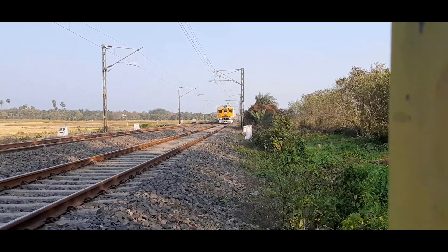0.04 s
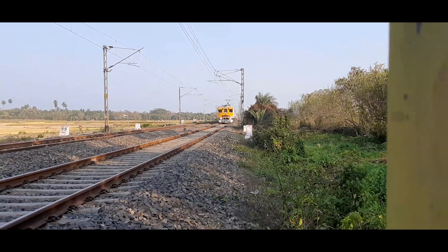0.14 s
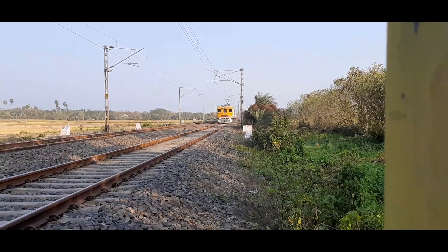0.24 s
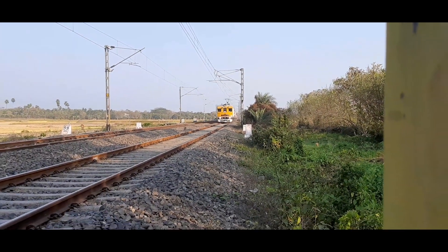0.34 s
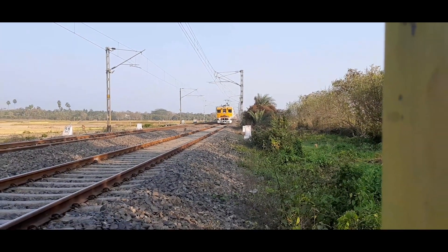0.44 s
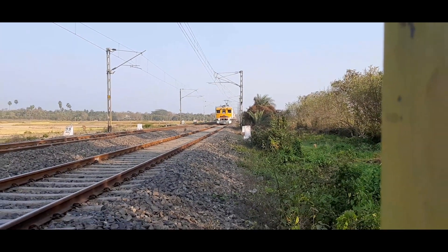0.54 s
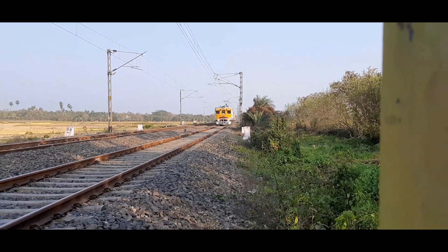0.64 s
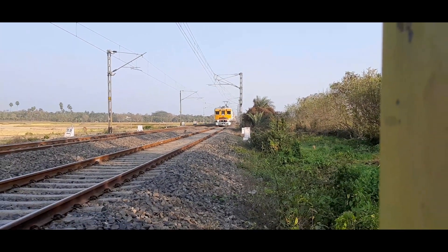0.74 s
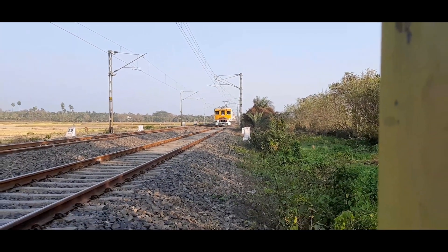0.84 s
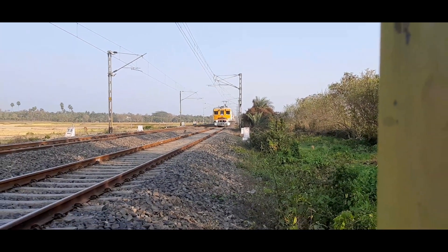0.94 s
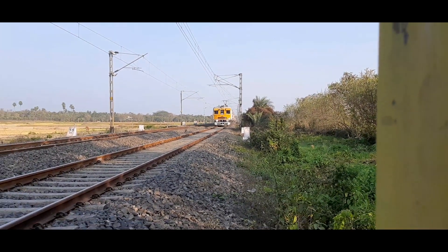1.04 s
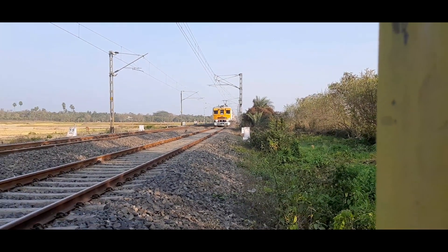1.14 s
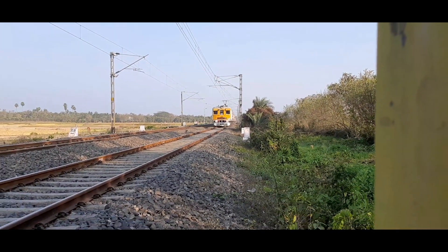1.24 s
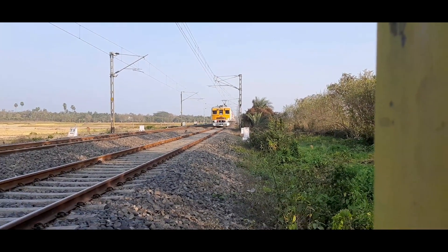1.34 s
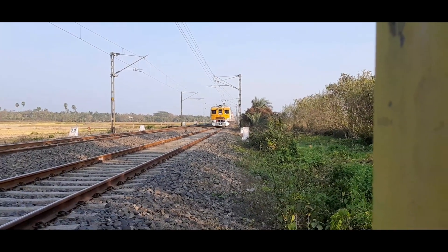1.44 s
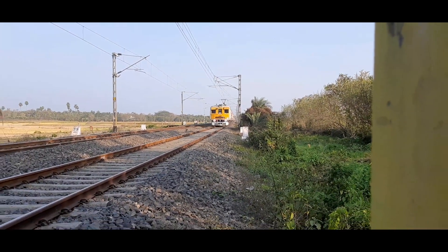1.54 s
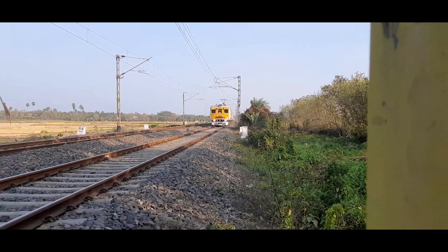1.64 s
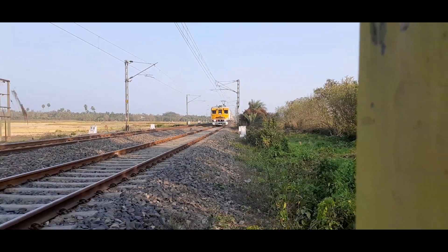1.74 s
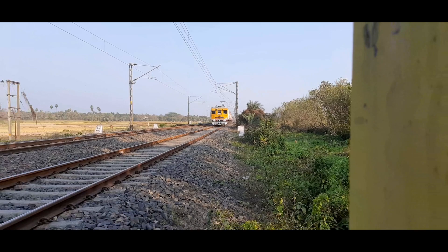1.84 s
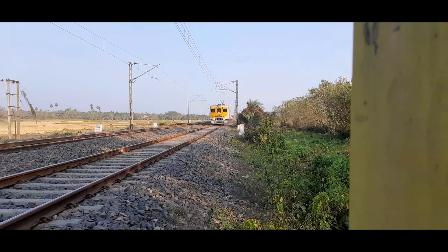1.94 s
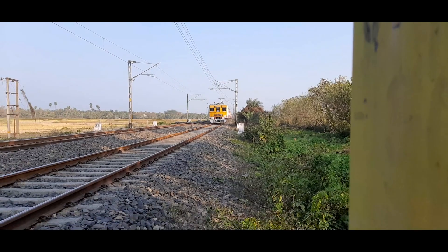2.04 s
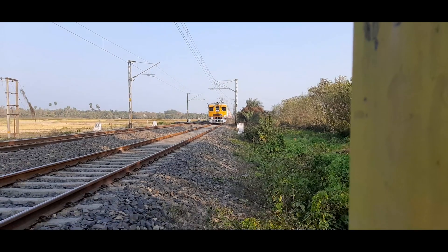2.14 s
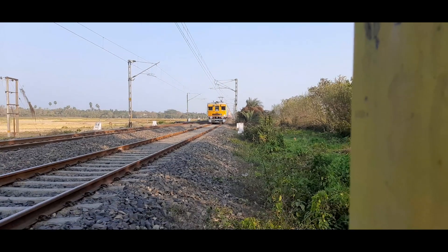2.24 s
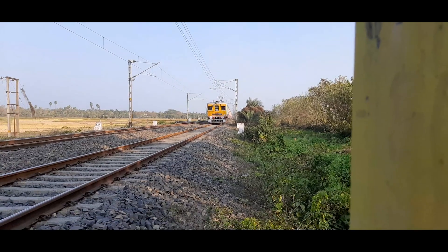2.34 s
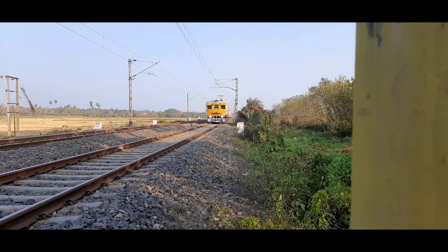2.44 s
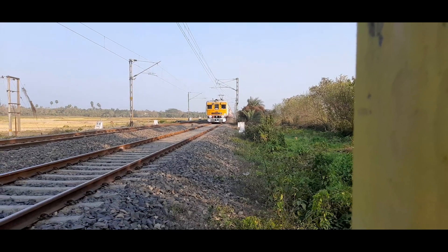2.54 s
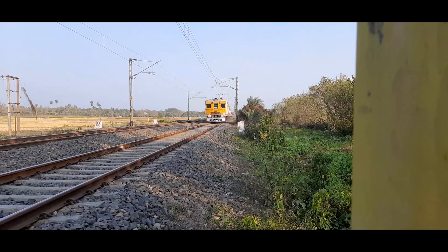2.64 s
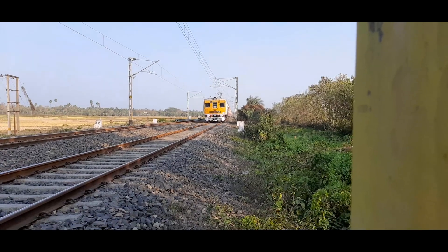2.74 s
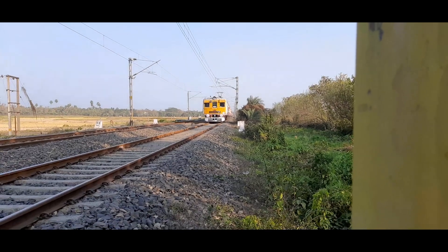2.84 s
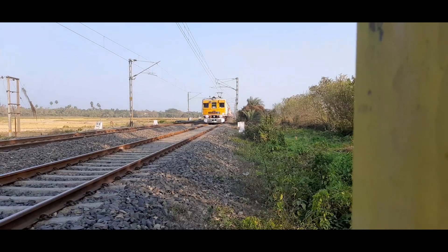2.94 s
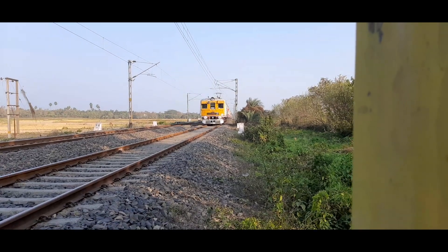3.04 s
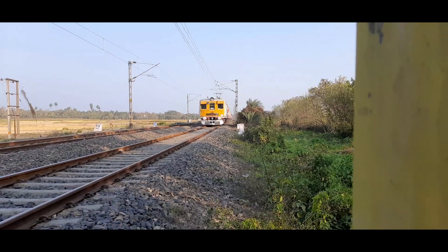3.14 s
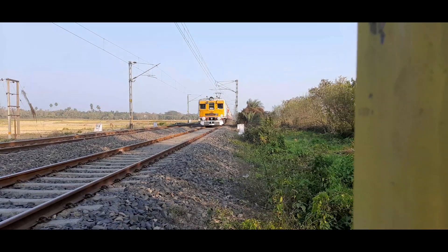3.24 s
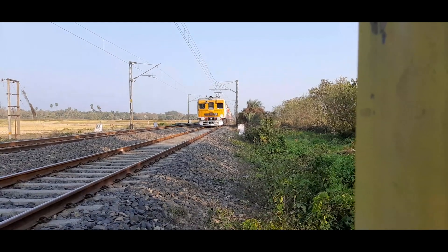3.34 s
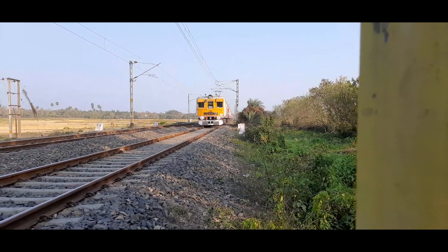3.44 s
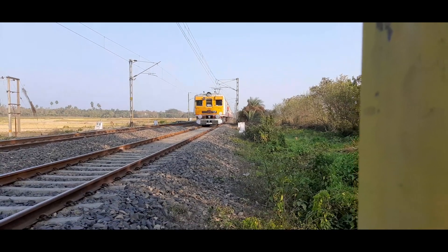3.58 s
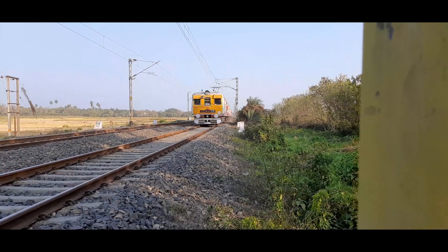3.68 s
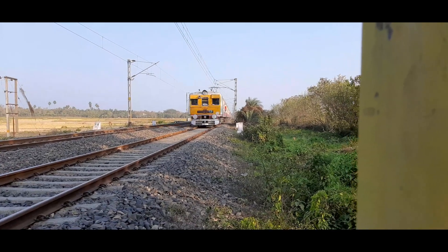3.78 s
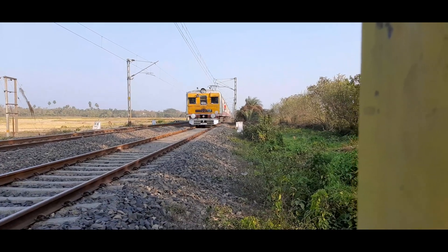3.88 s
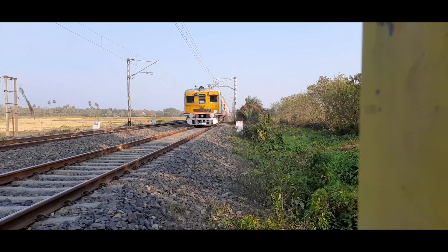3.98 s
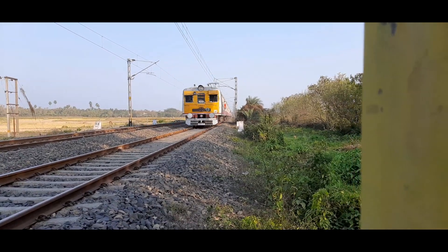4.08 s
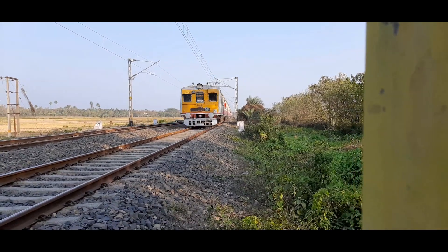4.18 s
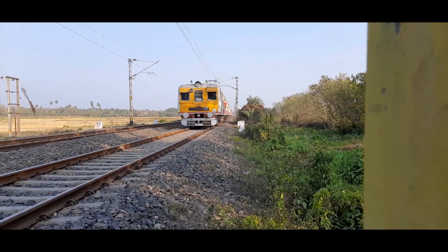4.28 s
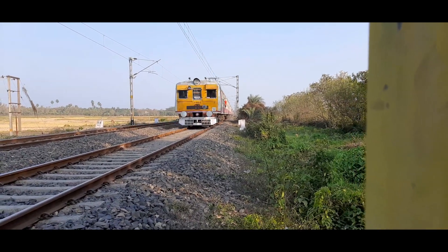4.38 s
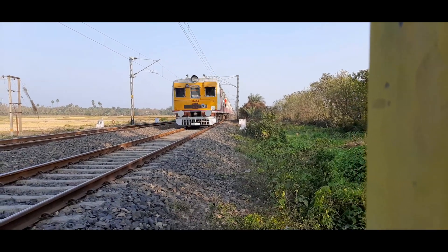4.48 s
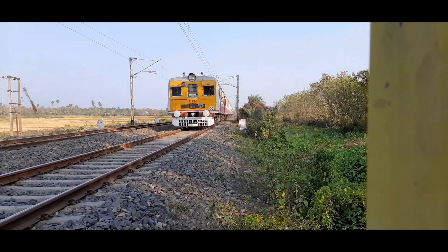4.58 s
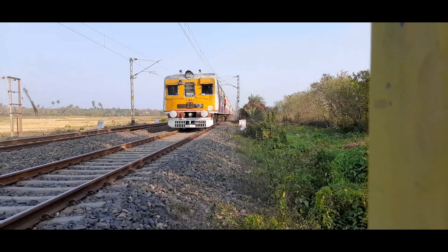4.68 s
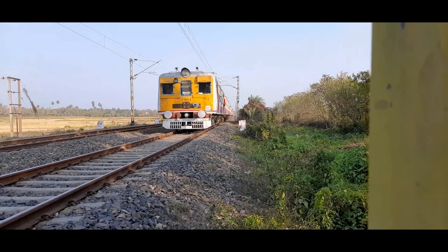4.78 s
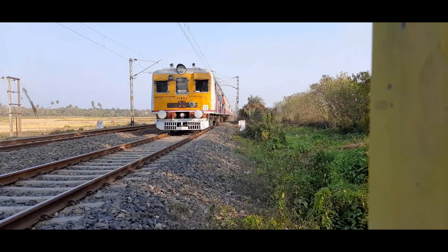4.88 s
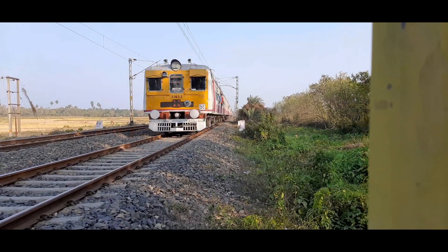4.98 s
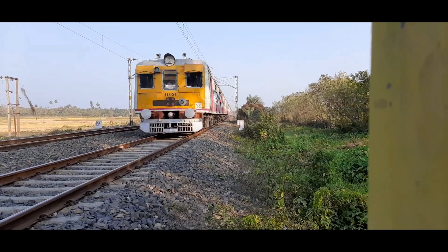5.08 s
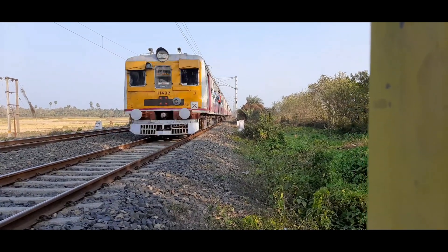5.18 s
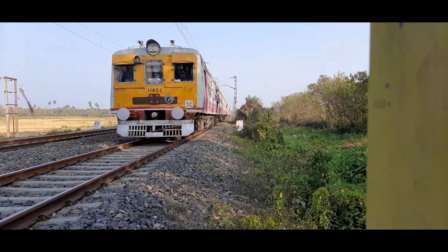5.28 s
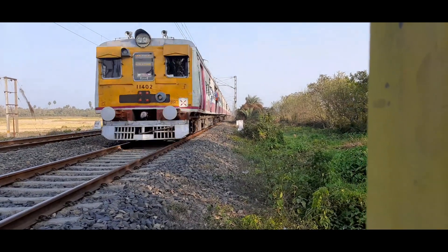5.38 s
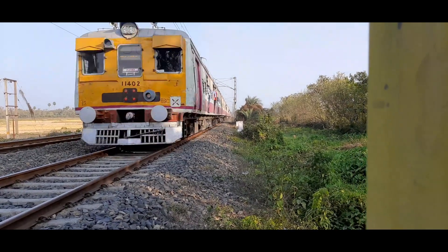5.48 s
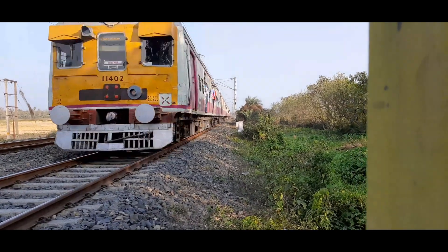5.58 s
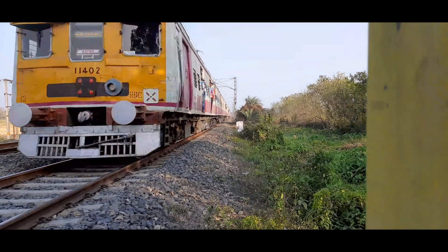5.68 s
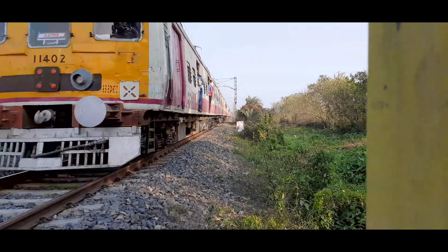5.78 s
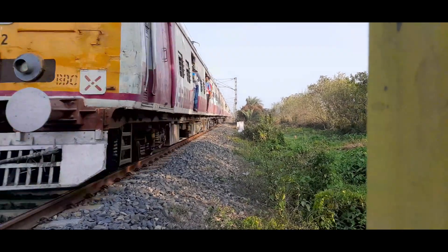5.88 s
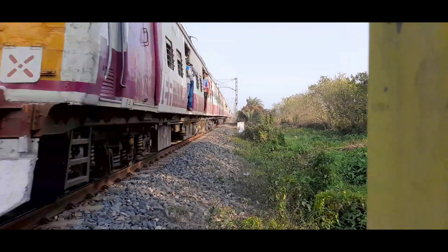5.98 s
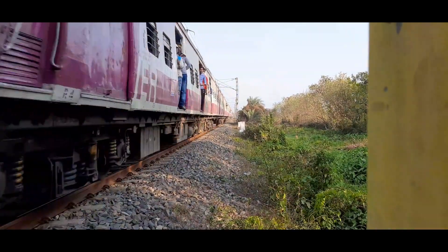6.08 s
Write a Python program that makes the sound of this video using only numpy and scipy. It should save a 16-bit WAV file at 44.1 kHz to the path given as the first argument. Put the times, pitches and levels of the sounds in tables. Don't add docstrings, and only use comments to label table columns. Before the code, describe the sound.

A commuter train approaches through open fields. First a low rumble, muffled thumps, a few metallic joint knocks and bird whistles in nearby bushes; then two sustained, single-pitched air horn blasts of about a second each, the second nearer and more changeable in its overtones. After the horn stops, wheel noise surges, deep and gritty, with dense heavy blows close by. Stereo hand-held phone, open air, only light scattered reflections and little deep bass.

```python
import sys
import numpy as np
from scipy import signal
from scipy.fft import rfft, irfft, next_fast_len
from scipy.io import wavfile
from scipy.ndimage import uniform_filter1d, map_coordinates

SR = 44100
rng = np.random.default_rng(int(sys.argv[2]) if len(sys.argv) > 2 else 0)


def gain_from_db(level_db):
    decades = np.asarray(level_db, float) / 20
    return 10 ** decades


def log_audio(samples):
    frames = np.atleast_2d(samples).T
    limited = np.clip(frames, -1, 1)
    pcm = np.round(limited * 32767).astype(np.int16)
    wavfile.write(sys.argv[1], SR, pcm)


N = 269892

# time in seconds, pitch in Hz, tone in dB, buzz in dB.
HORN_BLASTS = [
    [(2.757, 759.3, -9.5, 4.5), (2.895, 762.2, -12.5, 1.5), (3.12, 759, -18, -5.5), (3.27, 763, -12, 2),
     (3.42, 760.8, -13, 1.5), (3.5, 761.2, -11.5, 2.5), (3.57, 761.8, -17, -6), (3.645, 759.5, -21, -9.5),
     (3.73, 764, -27, -4.5)],
    [(4.26, 758, -12.5, 1.5), (4.405, 763.4, -12.5, 2.5), (4.48, 760, -13.5, 4.5), (4.63, 759.4, -13.5, -4),
     (4.855, 758, -12.5, -2.5), (5.08, 757.8, -12, -1), (5.28, 757.2, -12.5, 0.5), (5.38, 754.8, -9, 7),
     (5.475, 759.5, -12.5, 12.5)],
]
# multiple, level over the tone in dB, drift in dB/s, share of buzz.
FAR_OVERTONES = [(1, 1, 5, -0.26), (2, -27.5, 12.5, 0.45), (3, -33.5, 29.5, 1), (4, -28, 6.5, -0.36),
                 (5, -45.5, 4, -1.7), (6, -45, 3.5, 0.09), (7, -49.5, -2, .3), (8, -45.5, 13, 0.8),
                 (9, -44, 23, 0.29), (10, -52, 3.5, 0.12), (11, -65.5, 0.5, -0.01),
                 (12, -63.5, -19.5, -0.22), (13, -55.5, 11.5, 0.28), (14, -66, 11.5, 0.77),
                 (15, -66.5, 4, 0.32), (16, -60, 1.5, 0.16), (17, -66.5, -1.5, -0.3), (18, -68.5, 16, 0.07),
                 (19, -60.5, 7, -0.35)]
# multiple, level over the tone in dB, drift in dB/s, share of buzz.
NEAR_OVERTONES = [(1, 1, -2, 0.0), (2, -26, -8, 0.1), (3, -44, -10.5, 0.88), (4, -33, -0.5, 0.03),
                  (5, -45, 15, -0.34), (6, -45, 23.5, -0.56), (7, -37.5, 26, -0.2), (8, -43.5, 10, -0.8),
                  (9, -47.5, -8, 0.7), (10, -50, -2, 0.5), (11, -47, 0.5, -0.1), (12, -58, -19.5, 1.5),
                  (13, -42.5, 6, 0.06), (14, -56, -14, 0.7), (15, -60, 0.5, 0.5), (16, -48.5, 8, -0.2),
                  (17, -48, 17, -0.5), (18, -49, 9, -0.14), (19, -56, 5, -4), (20, -63, 6.5, 0.5)]
# frequency in Hz, left-right in dB, left lead in rad, turning of that lead in rad/s.
HORN_AT_PHONE = [
    [(760, -2.5, 0.14, -0.19), (1520, 7, 1.86, -.8), (2280, 6, 1.4, -.8), (3040, 4, 1.7, 0),
     (3800, -4, 1.4, 1), (5300, 4.5, 2.3, 0), (14000, 5.5, 0.5, 0)],
    [(760, -1, 0.35, 0.73), (1500, 2.5, 2.09, 0.8), (2280, 9.5, 2.06, -0.5), (3040, 3, 1.77, 1.5),
     (3800, 6.5, 2.2, 1.5), (4550, 7, 4.4, 6.5), (5470, 4, 2.9, 3), (6000, 8.5, 4.6, 4.5),
     (14000, 9, 6.5, 2)],
]
# time in seconds, width in seconds, overtone multiple, change in dB.
PATHS_MEET = [(4.4, 0.03, 4, -12), (5.11, .06, 4, -9), (5.22, .03, 4, 6), (4.6, .02, 4, -7),
              (4.95, 0.079, 4, 3.5), (5.4, .08, 7, 4), (4.72, .04, 7, -4.5), (4.86, 0.055, 6, 6.5),
              (4.97, .03, 6, -6), (5.1, .04, 6, 4), (4.37, .03, 9, -6), (4.48, .05, 9, 3.5),
              (4.72, .08, 9, -7), (5.48, .04, 3, 9.5), (5.14, 0.11, 7, 1.5), (5.47, .04, 7, -7.5),
              (5.2, .15, 17, -3.5), (5.34, .06, 2, 2.5), (4.33, .05, 13, 10.5), (4.7, .1, 13, -5),
              (4.96, .04, 5, 5.5), (3.5, .06, 9, -6), (2.97, .03, 5, 4), (3.4, 0.046, 4, 5),
              (2.9, 0.05, 3, 4.5), (2.95, .07, 7, 2.5), (3.05, .07, 8, -4.5)]

# frequency in Hz, level in dB per Hz.
THRUM_COLOUR = [(15, -63), (25, -33.5), (41, -9.5), (75, 0.5), (171, -10.5), (190, -9.5), (227, -24.5),
                (300, -34.5), (390, -48.5), (660, -120)]
# frequency in Hz, level in dB per Hz.
ROLL_COLOUR = [(59, -39.5), (100, -3.5), (141, -12), (210, -3.5), (254, -4.5), (370, -10.5), (464, -7.5),
               (533, -18), (819, -14.5), (994, -21.5), (1300, -50), (1690, -67.5), (2860, -120)]
# frequency in Hz, level in dB per Hz.
GRIND_COLOUR = [(590, -32), (1000, -3.5), (1270, -10), (1960, -5), (2700, -8.5), (3010, -7), (5190, -9.5),
                (8500, -20.5), (11000, -57), (18700, -120)]
# frequency in Hz, level in dB per Hz.
HISS_COLOUR = [(4710, -27.5), (8000, -4), (9580, 1), (10600, -2), (14100, -7), (15500, -19)]
# frequency in Hz, width in Hz, level in dB.
RAIL_HUM = [(447.7, 19, 1.5), (740.5, 22, 0.5), (1010, 72, -1.5), (1388, 47, -3.5), (1540, 110, -7)]
# time in seconds, roughness in dB.
TRACK_ROUGHNESS = [(0, 2), (.47, -1), (.75, 0.5), (1.2, -2), (1.74, 1.5), (2.0, -1.5), (2.59, 3.5),
                   (3.2, -3), (3.44, -6), (3.7, 0.5), (3.95, 4), (4.33, -0.5), (4.86, 1), (5.3, 0),
                   (5.5, 2.5), (5.76, 3), (6.12, -2)]

# time in seconds, peak in dB, ring in Hz, clunk in dB, thud in dB.
FAR_JOINTS = [(0.8194, -48, 990, -8, 15), (1.3535, -33.5, 1362, -21, -5), (1.5442, -30.5, 1010, -12, -4),
              (1.546, -39, 1290, -20, -20), (1.6969, -32, 1050, -9, 0), (1.8808, -30.5, 1010, -26, -12),
              (2.6633, -35.5, 982, -11.5, -6), (2.7706, -32.5, 895, 5, -5.5),
              (3.6877, -31, 1405, -7.5, -7.5), (3.709, -41.5, 880, -7.5, 21), (3.8741, -30, 937, 1, -11)]
# time in seconds, peak in dB, pitch in Hz.
NEAR_WHEELS = [(5.313, -25, 204.3), (5.348, -29.5, 283), (5.38, -24.5, 230.2), (5.414, -29, 233),
               (5.438, -21, 234), (5.499, -20.5, 279), (5.578, -20, 243), (5.633, -18, 255),
               (5.657, -20.5, 260), (5.73, -21.5, 230.7), (5.754, -21.5, 255), (5.801, -20, 251.4),
               (5.837, -19, 235.5), (5.858, -16.5, 277), (5.935, -14, 259), (5.989, -20, 223),
               (6.036, -16, 265), (6.079, -15, 224), (6.11, -11, 313)]
# time in seconds, peak in dB, pitch in Hz.
GROUND_BOOMS = [(0.321, -35, 86.1), (0.491, -35, 80), (0.626, -31, 64.8), (0.763, -28, 93),
                (0.884, -31.5, 92.5), (1.01, -31, 83.4), (1.146, -31, 86.6), (1.487, -30, 89),
                (1.68, -27, 78.4), (1.818, -29, 88.8), (2.111, -27, 80.7), (2.456, -29.5, 73.2),
                (2.615, -34.5, 87), (3.091, -35, 107.8), (3.157, -33, 94.2), (3.278, -37.5, 110.7),
                (3.408, -40.5, 117.3), (3.52, -36, 78.1), (3.763, -29.5, 94.9), (3.945, -32.5, 99.3),
                (4.147, -25.5, 96.3), (4.336, -34.5, 158), (4.423, -30, 87.7), (4.548, -35, 65),
                (4.644, -33, 100.5), (4.737, -28, 84.6), (4.993, -31, 105), (5.075, -27, 92.8),
                (5.523, -33, 153), (5.66, -29, 104), (5.83, -24, 122), (5.927, -24, 78)]
# time in seconds, peak in dB, pitch in Hz.
CLOSE_BOOMS = [(5.169, -33, 91.5), (5.289, -29, 105), (5.429, -29, 94.2), (5.569, -32, 100),
               (5.739, -26.5, 157), (5.879, -35, 155), (6.049, -22, 80.9), (6.088, -27, 91)]
# time in seconds, level in dB.
SPARKS = [(3.673, -48), (3.86, -46.5), (5.716, -44), (5.879, -43)]

# start in seconds, length in seconds, start pitch in Hz, level in dB.
RISING_NOTES = [(0.14, 0.065, 2760, -62), (.269, 0.088, 2660, -63), (.27, 0.12, 3750, -62),
                (0.332, 0.026, 4850, -60), (0.379, 0.09, 2414, -65), (0.461, 0.066, 3300, -57.5),
                (0.615, .05, 3450, -62), (0.842, 0.099, 2300, -62), (1.023, 0.077, 4820, -54),
                (1.015, .036, 2855, -53.5), (1.349, 0.11, 3105, -57), (1.47, .07, 3350, -67),
                (1.466, 0.092, 2160, -61.5), (1.492, 0.066, 4130, -55.5), (1.712, 0.074, 2100, -63),
                (2.207, 0.08, 2980, -60), (2.25, 0.06, 2380, -58), (2.308, 0.08, 3600, -63),
                (2.56, 0.12, 2404, -63), (2.714, 0.07, 2420, -56.5), (3.72, 0.088, 3600, -59.5),
                (4.079, 0.028, 4250, -57.5)]
# start in seconds, start pitch in Hz, level in dB.
FALLING_CHIPS = [(0, 4590, -62), (0.371, 3340, -62), (.43, 4480, -58), (.51, 3550, -56.5),
                 (1.638, 4950, -59.5), (4.126, 4050, -56), (4.597, 4400, -59.5), (4.651, 4410, -59),
                 (4.71, 4300, -66), (4.765, 4380, -65.5)]
# start in seconds, length in seconds, pitch in Hz, level in dB.
LEVEL_NOTES = [(.01, .05, 3700, -64), (0.147, 0.11, 3404, -65), (.517, 0.03, 4280, -64),
               (0.76, .09, 4740, -59), (1.147, 0.031, 2840, -52.5), (.695, .065, 3500, -61),
               (0.946, .06, 2650, -70), (1.005, .015, 4500, -59), (1.402, .045, 5500, -63),
               (1.93, .04, 2550, -69), (2.816, .022, 4280, -58), (2.865, .03, 4550, -60.5),
               (3.022, .025, 4260, -63.5), (3.812, .07, 3800, -66), (1.601, 0.031, 5420, -63),
               (1.752, 0.066, 2832, -56), (5.488, 0.036, 4860, -51.5), (5.871, .014, 5040, -45.5)]
# start in seconds, length in seconds, start pitch in Hz, end pitch in Hz, level in dB.
STEEP_NOTES = [(1.05, .04, 3100, 4330, -62), (1.111, .04, 4510, 3500, -61), (1.445, 0.05, 3450, 4130, -62),
               (1.07, .05, 4300, 4700, -54), (1.555, .035, 4300, 4900, -57), (2.41, 0.07, 3800, 4700, -67),
               (2.748, 0.045, 5050, 4780, -60), (3.586, .08, 3860, 5420, -58)]
# start in seconds, length in seconds, start pitch in Hz, held pitch in Hz, level in dB.
HOOKED_NOTES = [(2.892, 0.042, 4780, 5110, -51.5), (1.4, 0.071, 3200, 4000, -59),
                (2.352, 0.07, 3950, 3520, -53), (4.1, 0.038, 5100, 4250, -58),
                (2.708, .045, 3800, 3550, -52.5)]
# time in seconds, pitch in Hz, level in dB.
DOVE_COO = [
    (3.42, 338, -48.5),
    (3.48, 332, -44),
    (3.53, 330, -29.5),
    (3.6, 329, -37.5),
    (3.66, 326, -45),
]

# frequency in Hz, 60 dB decay in seconds.
HEDGE_DECAY = [(300, 0.13), (760, 0.78), (3000, 0.56), (10000, 0.13)]
# frequency in Hz, level in dB per Hz.
LEAVES_COLOUR = [(180, -45.5), (300, -8.5), (449, -12), (516, -6.5), (740, -1), (862, -3.5), (1020, -1),
                 (1830, -12), (2620, -14), (7320, -39.5), (8300, -48.5), (10800, -61.5), (18300, -120)]
# frequency in Hz, width in Hz, level in dB.
INSECT_BANDS = [(7340, 1100, -1), (10430, 270, 3), (11030, 300, 6.5), (10800, 2100, -9.5),
                (12600, 5600, -20.5)]

# frequency in Hz, left-right likeness.
WIDE_LIKENESS = [(60, 0.77), (180, 0.75), (550, -0.038), (1650, -0.59), (4970, 0.4), (15000, -0.51)]
# frequency in Hz, left-right likeness.
WHEEL_LIKENESS = [(60, 0.6), (150, 0.58), (300, 0.98), (1400, 0.19), (3000, 0.16), (7000, 0.09)]
# frequency in Hz, left-right in dB.
MIC_BALANCE = [(60, 5), (200, -0.5), (1300, -1), (4400, -1), (15000, 9)]

ATTACK_S, ATTACK_DB, FLAT_START_HZ = .04, 25, 14
RELEASE_S, RELEASE_DB = (0.016, 0.077), 21
PASS_S = 6.297
THRUM_DB, THRUM_NEAR_DB, THRUM_GROWS, THRUM_ROUGH, DUCK_DB = -43, -24.5, 2, 0.39, 2
ROLL_DB, ROLL_GROWS = -20, 0.96
GRIND_DB, GRIND_GROWS, GRIND_ROUGH, GRIND_DUCK_DB = -39, 0.87, 0.18, 2
HISS_DB, HISS_GROWS, AIR_DB_PER_S, HISS_ROUGH, HISS_DUCK_DB = -58, 0.46, 4.5, -.2, 0.5
SLUR_HZ_PER_S, CHIP_S, CHIP_FALL, HOOK_S = 2700, 0.032, .88, 0.031
STRIKE_T = np.arange(SR // 8) / SR


def horn():
    out = np.zeros((2, N))
    blasts = zip(HORN_BLASTS, RELEASE_S, (FAR_OVERTONES, NEAR_OVERTONES), HORN_AT_PHONE)
    for held, release_s, overtones, side in blasts:
        rows = blown(held, release_s)
        a, b = round(rows[0][0] * SR), round(rows[-1][0] * SR)
        count = b - a
        pitch, tone_db, buzz_db = [c[a:b] for c in curves(rows)]
        phase = np.cumsum(2 * np.pi * pitch / SR)
        t = (np.arange(count) - count / 2) / SR
        flutter_db = .4 * wobble(30, count) + .4 * wobble(80, count) + .2 * wobble(170, count)
        weak_db = 1.6 * np.minimum(tone_db + 16.5, 0)
        ends = np.clip((t[-1] - abs(t)) / 0.023, 0, 1)
        for k, db, drift, share in overtones:
            lean_db, lead, turn = [along(side, k * held[0][1], column=c) for c in (1, 2, 3)]
            start = rng.uniform(0, 2 * np.pi)
            shaky = np.log(k)
            level_db = fading(k, a, b) + tone_db + db + drift * t + share * buzz_db + flutter_db + 3
            if k not in (1, 3):
                level_db = level_db + weak_db
            for ch, sign in enumerate((.5, -.5)):
                fade_db = shaky * (1.1 * wobble(8, count) + .7 * wobble(25, count))
                slip = .2 * shaky * wobble(9, count) + .06 * wobble(60, count)
                angle = k * phase + start + sign * (lead + turn * t) + slip
                out[ch, a:b] += ends * gain_from_db(level_db + sign * lean_db + fade_db) * np.sin(angle)
    return out


def blown(held, release_s):
    s0, hz0, db0, buzz0 = held[0]
    s1, hz1, db1, buzz1 = held[-1]
    attack = (s0 - ATTACK_S, hz0 - FLAT_START_HZ, db0 - ATTACK_DB, buzz0)
    release = (s1 + release_s, hz1, db1 - RELEASE_DB, buzz1)
    return [attack, *held, release]


def fading(k, a, b):
    t = np.arange(a, b) / SR
    change_db = 0 * t
    for s, width, multiple, db in PATHS_MEET:
        if round(multiple) == k:
            change_db += db * np.exp(-((t - s) / width) ** 2)
    return change_db


def train():
    thrum_db, roll_db, grind_db, hiss_db = levels()
    shake = wobble(14)
    rail = gain_from_db(-47.5) * rush(bands(RAIL_HUM), patchy_db=-1.0)
    return thrum(thrum_db) + roll(roll_db, shake) + grind(grind_db, shake) + hiss(hiss_db, shake) + rail


def levels():
    t = np.arange(N) / SR
    left_s = np.maximum(PASS_S - t, .05)
    near_db = 20 * np.log10(left_s[-1] / left_s)
    rough_db, = curves(TRACK_ROUGHNESS)
    blowing = sum((t > rows[0][0]) & (t < rows[-1][0]) for rows in HORN_BLASTS)
    on = uniform_filter1d(1. * blowing, size=8000)
    steady = gain_from_db(THRUM_DB + THRUM_ROUGH * rough_db - DUCK_DB * on)
    thrum_db = 20 * np.log10(np.hypot(steady, gain_from_db(THRUM_NEAR_DB + THRUM_GROWS * near_db)))
    roll_db = ROLL_DB + ROLL_GROWS * near_db + rough_db
    grind_db = GRIND_DB + GRIND_GROWS * near_db + GRIND_ROUGH * rough_db - GRIND_DUCK_DB * on
    hiss_db = HISS_DB + HISS_GROWS * near_db - AIR_DB_PER_S * left_s
    hiss_db += HISS_ROUGH * rough_db - HISS_DUCK_DB * on
    return thrum_db, roll_db, grind_db, hiss_db


def thrum(db):
    return gain_from_db(db + 3.0 + 0.55 * wobble(25.0)) * rush(colour(THRUM_COLOUR), patchy_db=1.5)


def roll(db, shake):
    noise = rush(colour(ROLL_COLOUR), patchy_db=0.45, alike=WHEEL_LIKENESS, lead=0.00032)
    return gain_from_db(db + 1.74 + 1.2 * shake) * noise


def grind(db, shake):
    noise = rush(colour(GRIND_COLOUR), patchy_db=.8, alike=WHEEL_LIKENESS, lead=.0003)
    return gain_from_db(db + 9 + .6 * shake) * noise


def hiss(db, shake):
    return gain_from_db(db + 15 + .5 * shake) * rush(colour(HISS_COLOUR), patchy_db=1.5)


def joints():
    out = np.zeros((2, N + SR))
    far_joints(out)
    near_wheels(out)
    ground_booms(out)
    sparks(out)
    return out[:, :N]


def far_joints(out):
    for s, db, hz, clunk_db, thud_db in FAR_JOINTS:
        modes = hz * rng.uniform(.7, 1.45, size=8)
        steel = ring(hz, 0.75) + sum(0.29 * ring(f, 1.5) for f in modes)
        steel += gain_from_db(clunk_db) * (ring(640, 3.1) + ring(790, 1.5))
        thud = gain_from_db(thud_db) * (ring(260, 0.75) + ring(450, 0.68)) / 2
        strike(out, s, decay(db - 0.5, 0.068, 0.0031) * steel + decay(db, 0.11, 0.011) * thud)


def near_wheels(out):
    for s, db, hz in NEAR_WHEELS:
        strike(out, s, decay(db + 2, 0.17, 0.0076) * (ring(hz, 1.4) + 0.27 * ring(hz * 1.7, 0.99)))


def ground_booms(out):
    for s, db, hz in GROUND_BOOMS + CLOSE_BOOMS:
        strike(out, s, decay(db + 6, 0.18, 0.014) * ring(hz, 1.9) * gain_from_db([[.8], [-.8]]))


def sparks(out):
    for s, db in SPARKS:
        snap = np.diff(rng.standard_normal((2, len(STRIKE_T) + 1)))
        strike(out, s, decay(db, .04, .001) * uniform_filter1d(snap, size=2))


def strike(out, s, sound):
    out[:, round(s * SR):][:, :len(STRIKE_T)] += sound


def decay(db, t60, rise):
    return gain_from_db(db - 60 * STRIKE_T / t60) * (1 - np.exp(-STRIKE_T / rise))


def ring(hz, spread):
    return np.sin(2 * np.pi * hz * STRIKE_T + rng.uniform(0, spread, (2, 1)))


def birds():
    out = np.zeros((2, N))
    for s, length, hz0, hz1, db, glide_s in notes():
        n = round(length * SR)
        u = np.arange(n) / n
        warble = .006 * wobble(60, n) + .01 * wobble(400, n)
        pitch = hz0 + (hz1 - hz0) * np.minimum(u * length / glide_s, 1)
        phase = np.cumsum(2 * np.pi * pitch * (1 + warble) / SR)
        lean_db, lag = rng.normal(0, 1.2), rng.uniform(-.3, 1.2)
        broken_db = 3 * wobble(60, n) + 2.8 * wobble(150, n)
        swell = gain_from_db(db + 9.0 + broken_db) * np.sin(np.pi * u) ** 0.22
        overtone = 0.021 * np.sin(2 * phase)
        pair = np.array([np.sin(phase) + overtone, np.sin(phase + lag) + overtone])
        out[:, round(s * SR):][:, :n] += swell * gain_from_db([[lean_db], [-lean_db]]) * pair
    return out


def notes():
    rising = [(s, length, hz, hz + SLUR_HZ_PER_S * length, db) for s, length, hz, db in RISING_NOTES]
    falling = [(s, CHIP_S, hz, hz * CHIP_FALL, db) for s, hz, db in FALLING_CHIPS]
    level = [(s, length, hz, hz, db) for s, length, hz, db in LEVEL_NOTES]
    whole_glides = [(*note, note[1]) for note in rising + STEEP_NOTES + falling + level]
    return whole_glides + [(*note, HOOK_S) for note in HOOKED_NOTES]


def dove():
    pitch, db = curves(DOVE_COO)
    t = np.arange(N) / SR
    on = uniform_filter1d(1. * ((t > DOVE_COO[0][0]) & (t < DOVE_COO[-1][0])), size=1500)
    return on * gain_from_db(db + 3) * np.sin(np.cumsum(2 * np.pi * pitch / SR))


def hedge(x, stretch=1):
    hz, t, z = signal.stft(rng.standard_normal((2, SR)), SR, nperseg=256)
    t60 = stretch * along(HEDGE_DECAY, hz)
    tail = signal.istft(z * gain_from_db(-60 * t / t60[:, None]), SR, nperseg=256)[1]
    sway = np.cos(1.3 * np.array([wobble(160 / stretch), wobble(160 / stretch)]))
    return 1.3 * sway * signal.fftconvolve(x, tail / np.linalg.norm(tail[0]), axes=1)[:, :N]


def field():
    leaves = rush(colour(LEAVES_COLOUR), patchy_db=2.5)
    insects = rush(bands(INSECT_BANDS), patchy_db=1.2)
    return gain_from_db(-45) * leaves + gain_from_db(-62.5) * insects


def rush(gain, patchy_db, alike=WIDE_LIKENESS, lead=0):
    z = signal.stft(rng.standard_normal((2, N)), nperseg=512)[2]
    patches = uniform_filter1d(rng.standard_normal(z.shape[1:]), size=5, axis=0)
    patches = uniform_filter1d(patches, size=10, axis=1)
    pair = signal.istft(z * gain_from_db(patchy_db * unit(patches)), nperseg=512)[1][:, :N]
    m = next_fast_len(N)
    hz = np.fft.rfftfreq(m, 1 / SR)
    turn = np.arccos(np.clip(along(alike, hz), -1, 1)) / 2
    mid, side = rfft(pair, m) * gain(hz) * [np.cos(turn), np.sin(turn)]
    lean = gain_from_db(along(MIC_BALANCE, hz) / 2) * np.exp(1j * np.pi * hz * lead)
    return unit(irfft([(mid + side) * lean, (mid - side) / lean], m)[:, :N])


def colour(points):
    return lambda hz: gain_from_db(along(points, hz))


def bands(peaks):
    return lambda f: np.sqrt(sum(gain_from_db(db) ** 2 / (1 + ((f - c) / w * 2) ** 8) for c, w, db in peaks))


def unit(x):
    return x / np.sqrt(np.mean(x ** 2) + 1e-20)


def along(points, hz, column=1):
    rows = np.array(points)
    return np.interp(np.log(hz + 1), np.log(rows[:, 0] + 1), rows[:, column])


def curves(rows):
    s, *cols = np.transpose(rows)
    return [np.interp(np.arange(N) / SR, s, c) for c in cols]


def wobble(rate, count=N):
    knots = rng.standard_normal(int(count * rate / SR) + 4)
    return map_coordinates(knots, [np.arange(count) * rate / SR])


def scene():
    blast, song, knocks = horn(), birds(), joints()
    near = hedge(gain_from_db(-1.5) * song + gain_from_db(-13) * knocks)
    far = gain_from_db(-25) * hedge(blast, stretch=3)
    return blast + gain_from_db(-2.0) * song + knocks + near + far + train() + field() + dove()


def roll_off(x):
    return signal.sosfilt(signal.butter(12, 15700, fs=SR, output="sos"), x)


def record(dry):
    bass_cut = signal.butter(4, 42, "high", fs=SR, output="sos")
    mix = signal.sosfilt(bass_cut, dry)
    return roll_off(mix)


dry = scene()
out = record(dry)
log_audio(out)
```